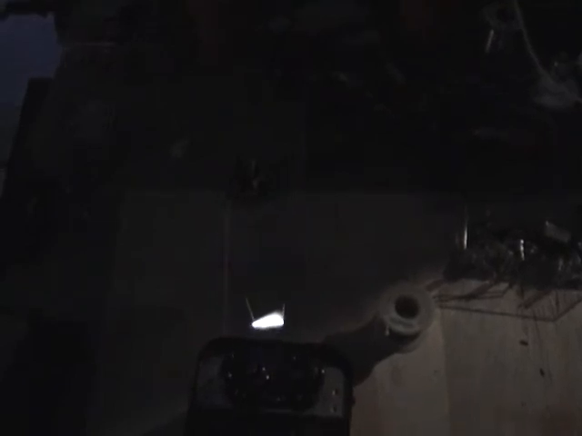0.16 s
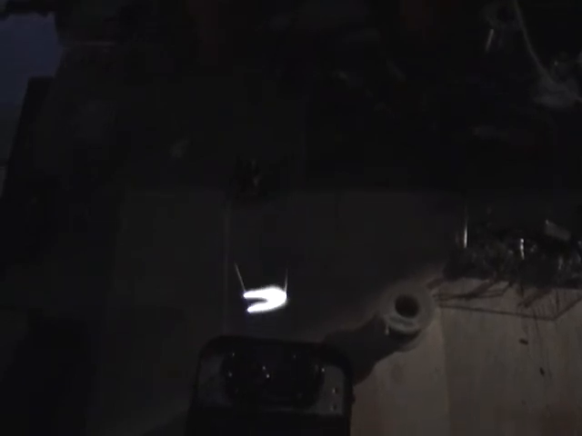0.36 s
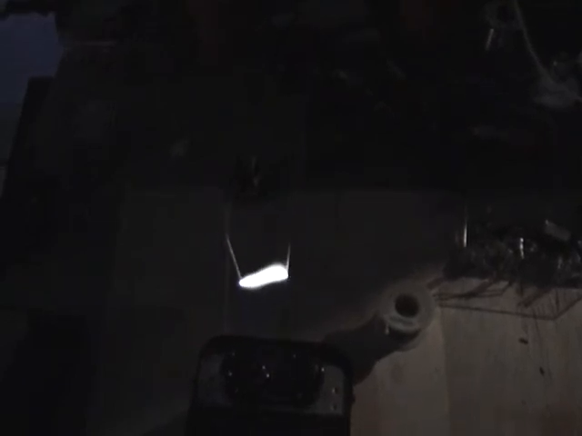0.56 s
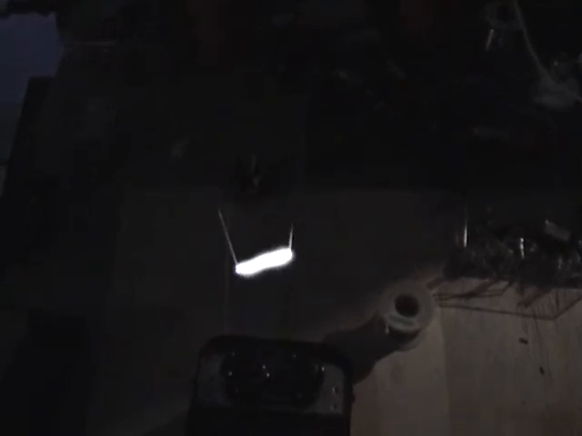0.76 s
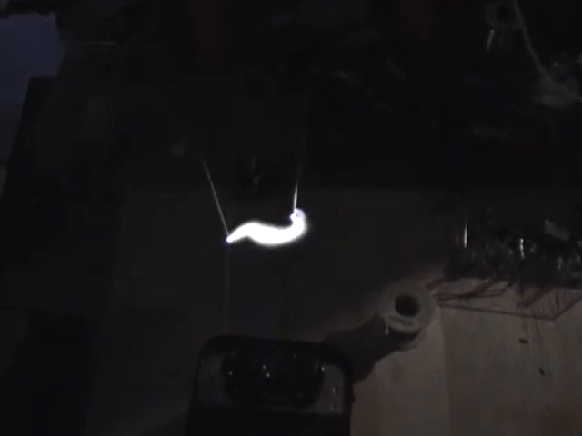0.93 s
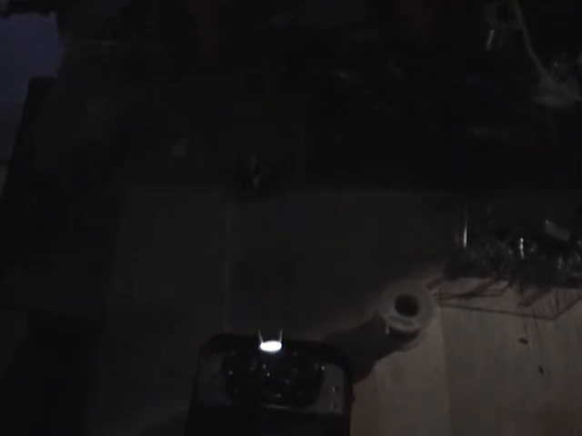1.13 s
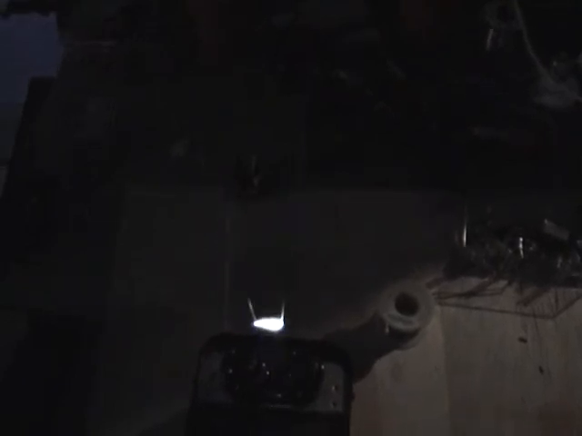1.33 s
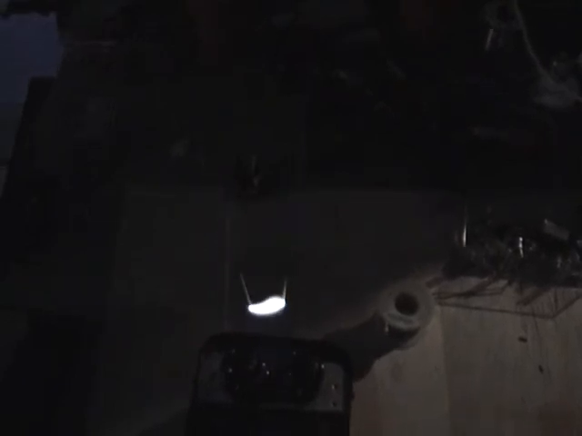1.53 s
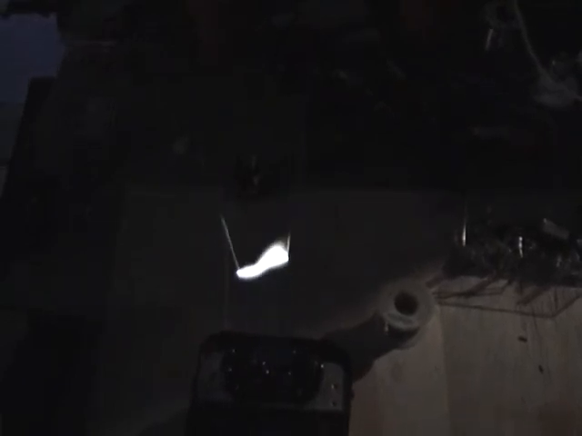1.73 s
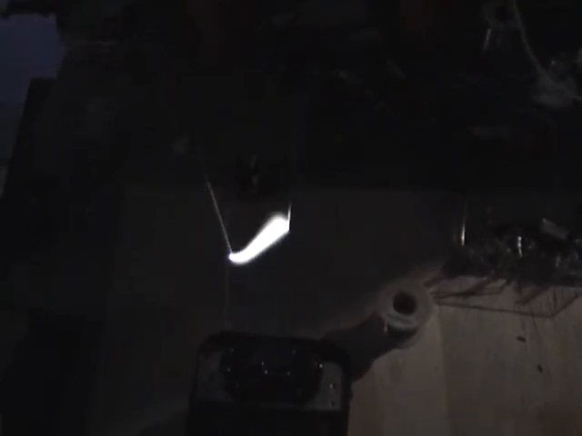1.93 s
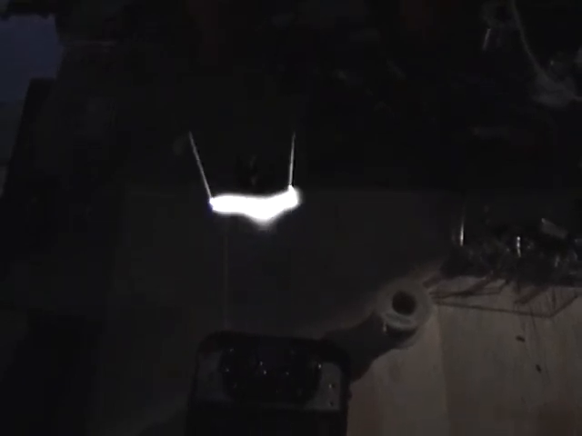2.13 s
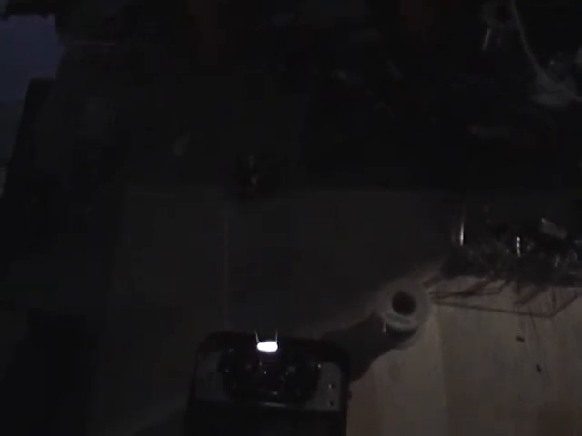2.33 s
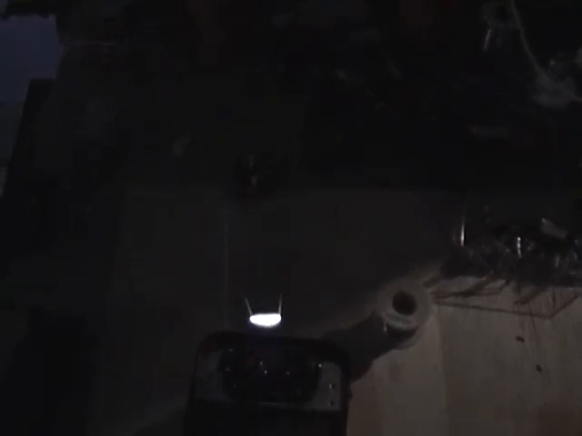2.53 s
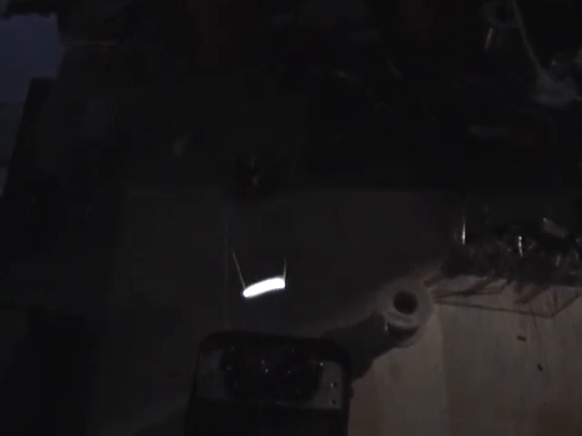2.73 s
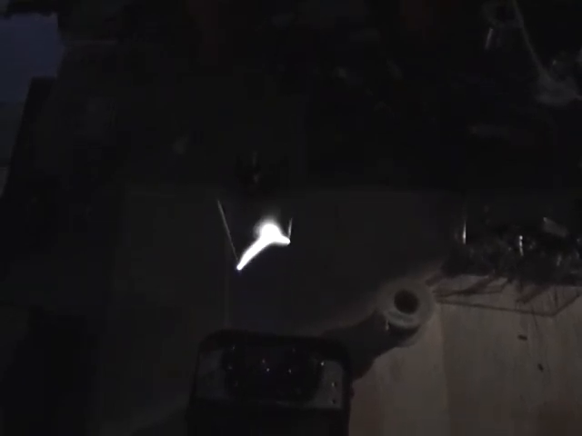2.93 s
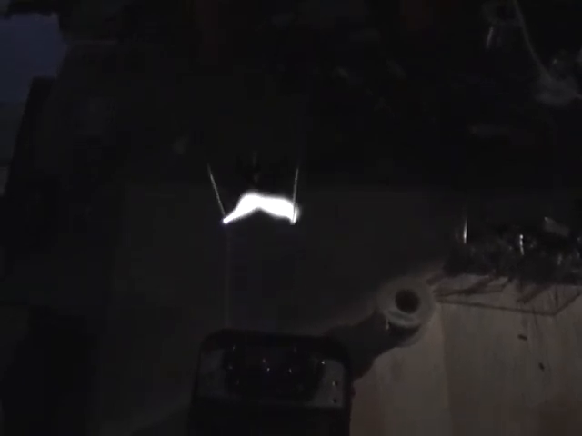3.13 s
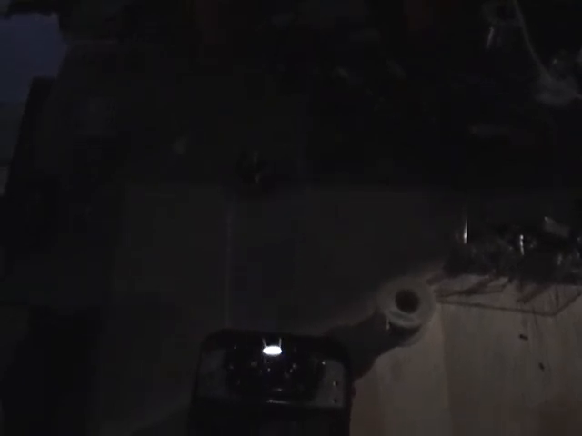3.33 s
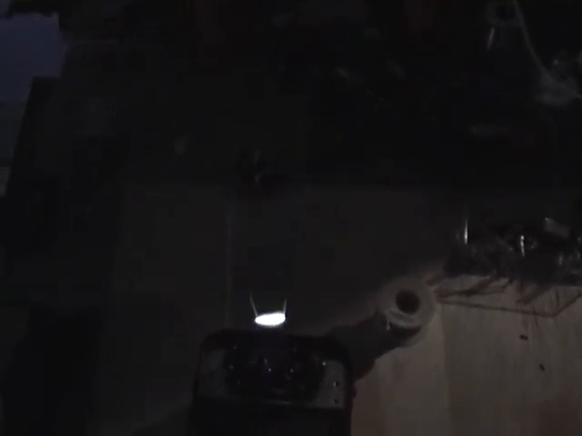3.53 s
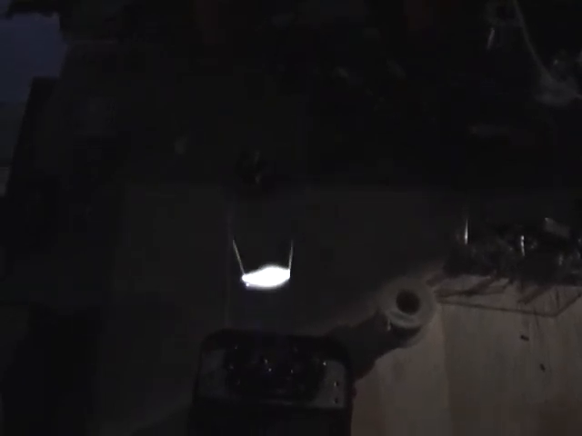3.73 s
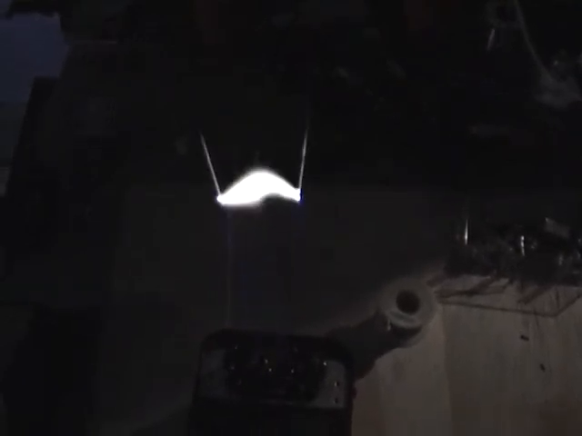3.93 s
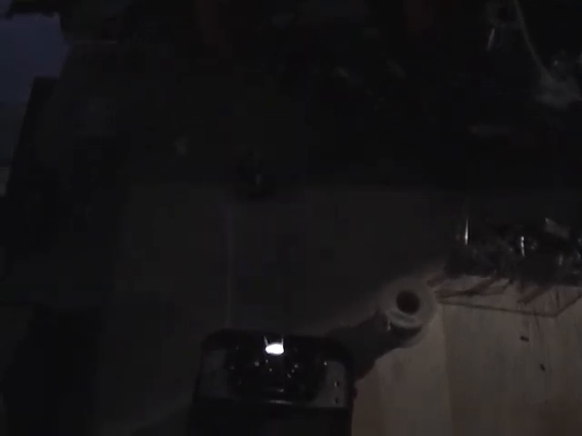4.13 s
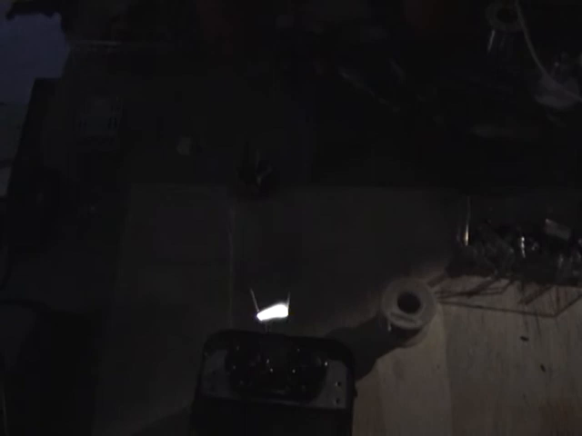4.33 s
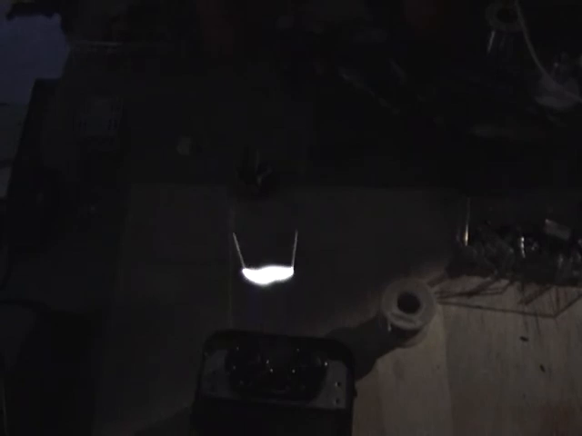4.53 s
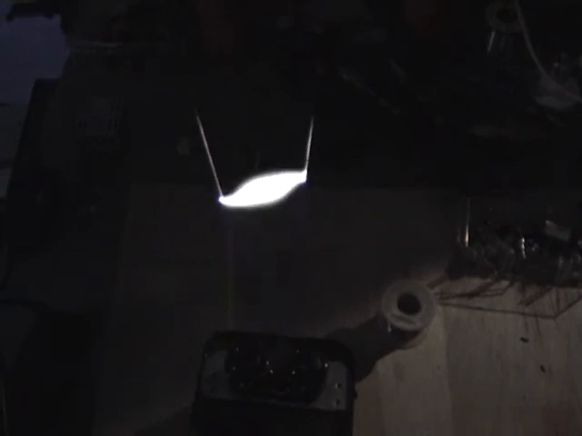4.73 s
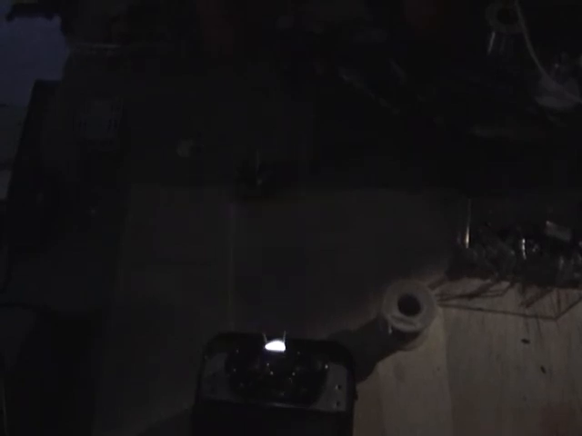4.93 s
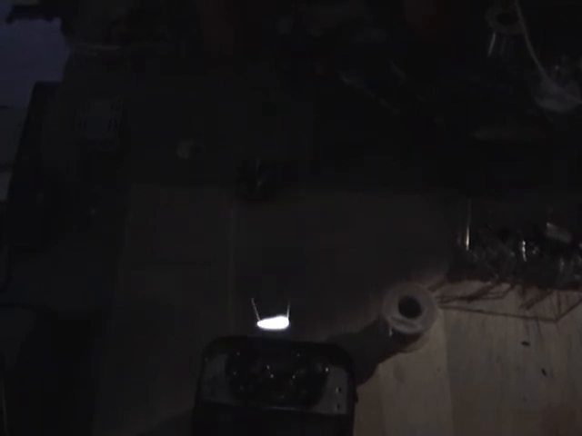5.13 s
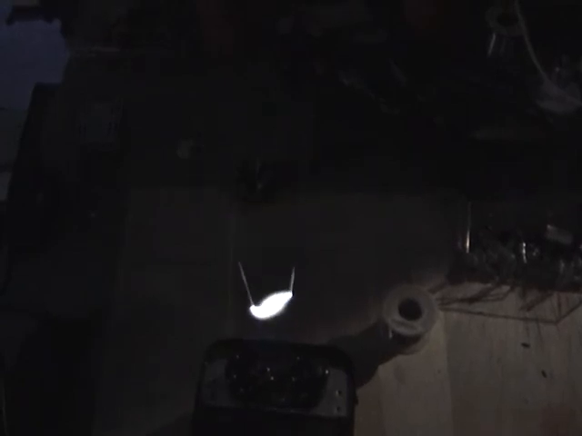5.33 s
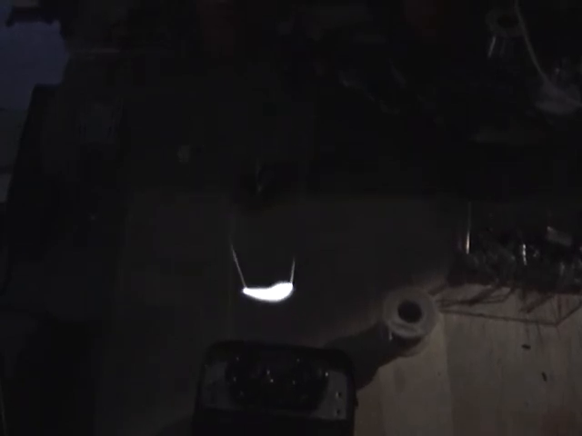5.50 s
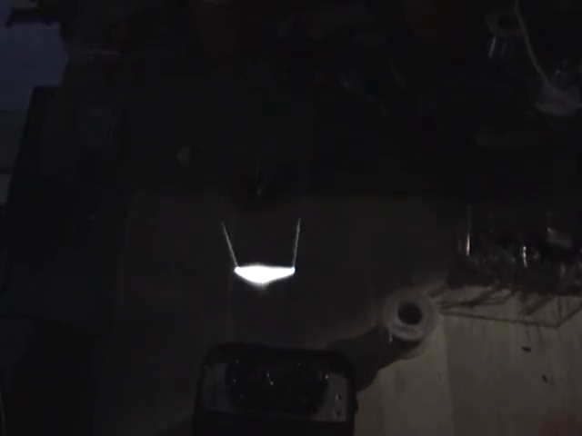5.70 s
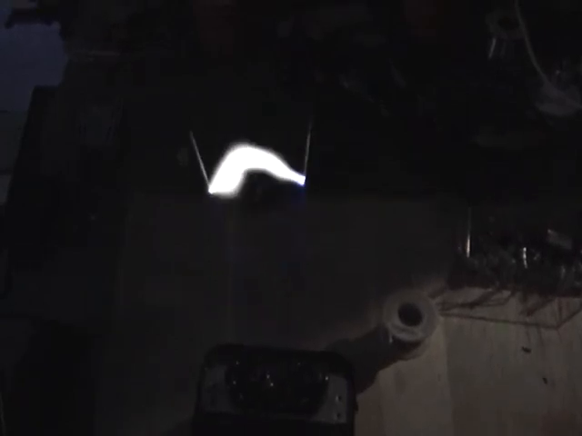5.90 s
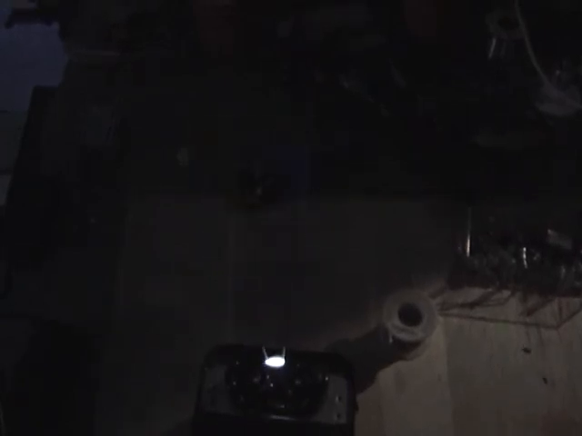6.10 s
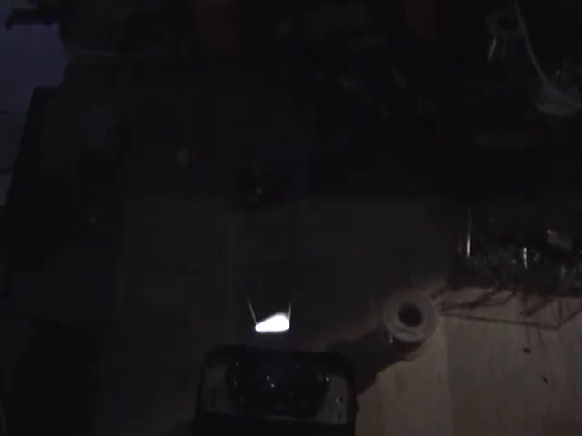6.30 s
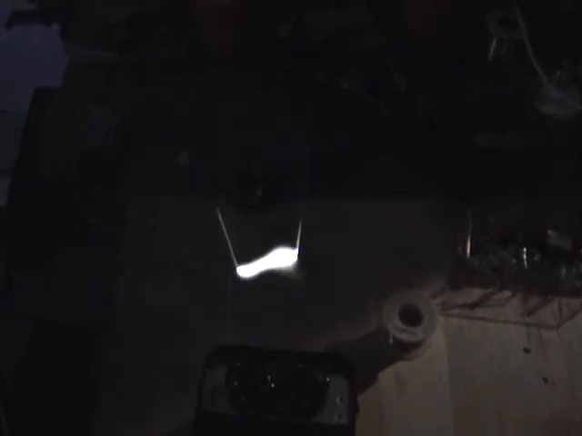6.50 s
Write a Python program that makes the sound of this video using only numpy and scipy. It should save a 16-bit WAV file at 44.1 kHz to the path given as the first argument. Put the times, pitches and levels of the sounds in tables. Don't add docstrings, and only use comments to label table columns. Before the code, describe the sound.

A harsh 120-per-second electric buzz swells and darkens as an arc climbs two rods, breaks with a sharp snap, and restarts over fan noise.

```python
import sys
import numpy as np
from scipy import signal
from scipy.fft import rfft, irfft
from scipy.io import wavfile
from scipy.ndimage import uniform_filter1d

SR = 44100
rng = np.random.default_rng(int(sys.argv[2]) if len(sys.argv) > 2 else 0)


def amplitude_ratio(level_db):
    exponent = np.asarray(level_db, float) / 20
    return 10 ** exponent


def unload_audio(sound):
    columns = np.transpose(np.atleast_2d(sound))
    steps = np.round(np.clip(columns, -1, 1) * 32767)
    wavfile.write(sys.argv[1], SR, steps.astype(np.int16))


N = 289296
STRIKE_HZ = 119.988
FRAME = 512
FRAME_HZ = np.arange(FRAME // 2 + 1) * SR / FRAME
JW = 2j * np.pi * FRAME_HZ

# turbulence onset t/s, sputter before onset level/dB, tick strength/dB, background level/dB
CLIMBS = [
    (.47, -23, 0.5, -34),
    (1.72, -27, 1, -33),
    (2.84, -20, 1, -33.5),
    (3.78, -61, -0.5, -34.5),
    (4.4, -33, -0.5, -34),
    (5.56, -27, -.5, -35),
    (6.41, -18, -1.5, -35),
]
# t/s, peak level/dB, length/ms, last tick of the dying arc level/dB
SNAPS = [
    (.9445, -5, .85, -20),
    (2.1614, -4, .85, -26),
    (3.2533, -2, .45, -7),
    (4.0447, -3, .55, -6),
    (4.7781, -1, .55, -9),
    (5.9619, -4, .6, -8),
]
# t/s, half length/s, shortening/0-1, background change level/dB
FOLDS = [
    (2.084, 0.26, .4, -2.5),
    (3.065, 0.19, 0.81, -7),
    (3.92, 0.1, .3, -1.5),
    (4.57, 0.1, 0.37, -1),
    (5.373, 0.14, 0.22, -0.5),
    (5.868, 0.21, 0.5, -3),
]


def arc():
    # t/s, extra level/dB of single strikes
    odd_strikes = [(0.8777, 2), (0.9278, 4.5), (2.1026, -3), (2.1279, 6), (2.1446, 3.5), (2.3292, -4),
                   (3.028, -8), (3.103, -8), (3.945, 0.5), (5.0544, 3), (5.3287, 5), (5.4206, 4.5),
                   (5.6117, 5), (5.7366, 4.5), (5.7945, 7.5), (1.9612, -2), (2.9862, 5.5), (3.1525, 5),
                   (5.8945, 4), (5.9194, -35.5), (5.9362, -13), (5.9447, 3)]
    foot_s = .00405
    grid = np.arange(int((N / SR - foot_s) * STRIKE_HZ)) / STRIKE_HZ + foot_s
    lead, peak_db, sputter_db, length = [column[:, None] for column in channel(grid - .001)]
    height, length = np.clip(lead, 0, 1.6), np.clip(length, 0, 1.6)
    chance = rng.standard_normal((len(grid), 11))
    swing = (-1.) ** np.arange(len(grid))[:, None]

    peak_db = peak_db + (0.43 + 0.22 * height) * chance[:, :1] - (0.13 + 0.11 * height ** 2) * swing
    for when, extra_db in odd_strikes:
        strike = np.argmin(abs(grid - lead[:, 0] / 1000 - when))
        peak_db[strike] += extra_db
        sputter_db[strike] += 0.2 * extra_db
    for when, _, _, last_db in SNAPS:
        peak_db[np.argmin(abs(grid - .0013 - when))] = last_db

    early_ms = lead + .025 * swing + (.008 + .04 * height ** 2) * chance[:, 1:2]
    start = grid - early_ms[:, 0] / 1000
    patchy_db = 4.5 * uniform_filter1d(chance, size=12, axis=0) + .8 * chance
    paths = near_echoes(height, patchy_db[:, 3:])
    paths = paths + after_sparks(sputter_db, 2.6 * chance[:, 2:3], length)
    return lay(amplitude_ratio(peak_db + 7.0) * radiated_tick(height, length) * paths, start)


def near_echoes(height, patchy_db):
    echoes = [
        (.21, .95, 9, -26, .003),
        (.44, .06, -10, 1, -.008),
        (.43, .95, -5, -14, .008),
        (.75, .09, -12, 0, -.015),
        (.86, .88, -10, -5, .015),
        (1.44, .05, -15, 0, -.02),
        (1.8, .68, -18, -3, .02),
        (2.3, .65, -20, -2, -.02),
    ]
    side = np.array([.5, -.5])[:, None, None]
    paths = np.exp(JW * side * 4e-6) * amplitude_ratio(side * 1.2 * np.tanh((FRAME_HZ - 6500) / 1500))
    rise = np.minimum(height ** .7, 1)
    for k, (delay, growth, foot_db, fade_db, lag) in enumerate(echoes):
        level_db = foot_db + fade_db * rise + patchy_db[:, k:k + 1]
        bright = np.where(growth > .5, FRAME_HZ ** 2 / (FRAME_HZ ** 2 + 4500 ** 2), 1)
        delay_ms = delay + growth * height / (1 + .3 * height) + side * lag
        paths = paths + amplitude_ratio(level_db) * bright * np.exp(-JW * delay_ms / 1000)
    return paths


def after_sparks(sputter_db, scatter_db, length):
    after = np.arange(FRAME) / SR
    dying = np.exp(-after / 0.0021) + 2.4 * np.exp(-after / 0.00036)
    dying = dying * (after > .00012) * (after < .009)
    sparks = rfft(rng.standard_normal((2, len(length), FRAME)) * dying)
    ring_hz = 8650 / (1 + 0.24 * length)
    ring = 1 / (1 + 2.5j * (FRAME_HZ / ring_hz - ring_hz / (FRAME_HZ + 1)))
    level_db = 2.11 * (sputter_db + 15.5) - 24.5 + scatter_db
    return amplitude_ratio(level_db) * widened(sparks[0], 0.58 * sparks[1], FRAME_HZ) * (0.46 + ring)


def radiated_tick(height, length):
    # f/Hz, width/Hz, level/dB
    case_modes = [
        (2860, 430, -21),
        (3236, 536, 3),
        (7850, 1600, -26),
        (5210, 860, -9),
        (6170, 430, 4.5),
    ]
    shape = tick_shape(6500 / (1 + 4.26 * length), 10500 / (1 + 0.39 * length), 0.47, 17000 / (1 + 2.74 * length))
    modes = 1
    for mode_hz, width, db in case_modes:
        share = -0.36 if 5600 <= mode_hz <= 7500 else 1
        modes = modes + amplitude_ratio(db) * share * resonance(mode_hz, width)
    shielded = 0.76 / (1 + np.exp((height - .33) / .025))
    return shape * modes * (1 - shielded * resonance(4000, 2600))


def resonance(mode_hz, width):
    return 1 / (1 + 1j * (FRAME_HZ ** 2 - mode_hz ** 2) / (FRAME_HZ + 1) / width)


def tick_shape(low_hz, peak_hz, damping, top_hz):
    low, s = JW / (2 * np.pi * low_hz), JW / (2 * np.pi * peak_hz)
    highpass = low ** 3 / (1 + low) / (1 + low + low ** 2)
    ring = s / (1 + damping * s + s ** 2)
    return highpass * ring / (1 + JW / (2 * np.pi * top_hz))


def channel(s):
    # t/s, level/dB, half length/s
    swells = [(.01, 4, 0.061), (0.614, 3, 0.042), (0.668, -5.5, 0.031), (0.803, -2, .05), (0.943, -26, .03),
              (1.9, -3, 0.15), (2.1, 0.5, 0.043), (2.136, -18, 0.018), (2.964, -3.5, 0.019),
              (2.982, -4, .025), (3.164, -10, 0.092), (5.617, 0.5, .06), (5.752, 1.5, 0.041),
              (3.998, -9.5, 0.038), (4.412, -1.5, .15), (4.688, -2, .08), (5.524, -0.5, 0.049),
              (5.824, -2.5, 0.11), (5.949, -14, 0.051)]
    foot_db, young_db, young_s = -43, -14.5, 0.19
    (climb, age, _), (lead, strain) = climb_at(s), lead_ms(s)
    rough_s, calm_db, strength_db, _ = np.array(CLIMBS)[climb].T
    swell_db = sum(db * tent(s, when, half) for when, db, half in swells)

    peak_db = -10.5 + strength_db + 5 * lead - 19.5 * np.exp(-age / 0.068) + swell_db

    gliding_db = foot_db + (young_db - foot_db) * ramp(age, 0, young_s)
    gliding_db = gliding_db + (calm_db - young_db) * ramp(s, s - age + young_s, rough_s)
    rough_db = -19 + 3.0 * lead - 0.34 * swell_db + 3.5 * strain
    torn = ramp(s, rough_s - .04, rough_s + 0.01)
    sputter_db = (1 - torn) * gliding_db + torn * rough_db

    length = 1.13 * (1 - np.exp(-lead / 0.59))
    length = length - sum(share * tent(s, when, half) for when, half, share, _ in FOLDS)
    return lead, peak_db, sputter_db, length


def lead_ms(s):
    # t at full bow/s, lead gained/ms, build-up/s, share kept
    bow_events = [(.513, .2, .22, -.4), (.692, .2, .13, -.15), (.9, .55, .16, .25), (1.77, .22, .2, .55),
                  (1.88, .32, .08, .5), (1.96, .12, .06, -3.6), (2.13, .4, .15, 1), (2.86, .13, .2, 1),
                  (2.94, .5, .08, .1), (3.02, .24, .06, 1), (3.12, .05, .05, -4.5), (3.62, .22, .35, 1),
                  (3.83, .33, .14, 1), (4.0, .15, .15, 1), (4.38, .2, .35, 1), (4.48, .39, .09, .46),
                  (4.58, .31, .09, .5), (5.15, .1, .3, 1), (5.345, .31, .17, .05), (5.635, .42, .13, 0),
                  (5.74, .3, .09, .4), (5.92, .4, .13, 1), (6.36, .35, .25, 1), (6.56, .35, .25, 1)]
    stretches = [.9, .2, .75, .55, .8, .4, 0]
    climb, age, left = climb_at(s)
    bows = strain = 0
    for when, ms, build, kept in bow_events:
        bow = ms * (climb == climb_at(when)[0])
        built, shorted = ramp(s, when - build, when) ** 2, ramp(s, when, when + .012)
        bows = bows + bow * (built - (1 - kept) * shorted)
        strain = strain + bow * (1 - kept) * built * (1 - shorted)
    steady = 1.0 * age
    return steady + bows + np.array(stretches)[climb] * ramp(.01 - left, -.06, 0) ** 2, strain


def climb_at(s):
    breaks = np.array(SNAPS)[:, 0]
    feet = np.r_[-.27, breaks + .0155]
    climb = np.searchsorted(breaks + .004, s)
    return climb, np.maximum(s - feet[climb], 0), np.r_[breaks, 2 * N / SR][climb] - s


def ramp(s, start, end):
    return np.clip((s - start) / (end - start + 1e-6), 0, 1)


def tent(s, when, half):
    return np.clip(1 - abs(s - when) / half, 0, 1)


def lay(frames, start_s):
    margin = 16
    at = np.floor(start_s * SR).astype(int)
    w = 2 * np.pi * np.arange(FRAME // 2 + 1) / FRAME
    waves = irfft(frames * np.exp(-1j * w * (start_s * SR - at + margin)[:, None]), FRAME)
    out = np.zeros((2, N + 2 * FRAME))
    for side in range(2):
        np.add.at(out[side], at[:, None] + np.arange(FRAME), waves[side])
    return out[:, margin:N + margin]


def snaps():
    # f/Hz, level/dB
    snap_ring = [
        (7700, 0),
        (11000, -11),
        (13300, -7),
        (14800, -12),
        (4600, -14),
        (6200, -11),
        (9300, -13),
        (3000, -18),
        (1500, -17),
        (700, -16),
    ]
    t, out = np.arange(400) / SR, np.zeros((2, N))
    for when, peak_db, length, _ in SNAPS:
        ring = 0
        for hz, db in snap_ring:
            level = amplitude_ratio(db + rng.normal(0, 1.5, (2, 1)))
            ring = ring + level * np.sin(2 * np.pi * hz * rng.normal(1, .03) * t)
        burst = (1 - np.exp(-t / .00006)) * np.exp(-np.maximum(t - length / 1000, 0) / .00025)
        at = round(when * SR)
        out[:, at:at + len(t)] += amplitude_ratio(peak_db - 4.0) * ring * burst
    return out


def workshop(x):
    # delay/ms, level/dB
    walls = [
        (3.35, -21),
        (5.3, -24),
        (10.2, -20),
        (14.6, -28),
    ]
    t60, tail_db = 0.17, -37.5
    t = np.arange(int(.4 * SR)) / SR
    mid, side = amplitude_ratio(tail_db - 60 * t / t60) * rng.standard_normal((2, len(t))) * (t > .002)
    for delay, db in walls:
        mid[round(delay * SR / 1000)] += amplitude_ratio(db)
    hz = np.arange(len(t) // 2 + 1) * SR / len(t)
    answer = irfft(widened(rfft(mid), 0.96 * rfft(side), hz), len(t))
    answer = signal.sosfilt(signal.butter(1, 14000, fs=SR, output="sos"), answer)
    return x + signal.fftconvolve(x, answer, axes=1)[:, :N]


def widened(mid, side, hz):
    low, high = (hz / 5000) ** 2, (hz / 10500) ** 6
    sign = np.array([1, -1]).reshape(2, *[1] * mid.ndim)
    return mid + side * sign * low / (1 + low) / (1 + high)


def background():
    # f/Hz, level/dB per Hz
    fan = [(60, -50), (110, -24), (155, -21.5), (190, -5.5), (300, 1.5), (345, -3.5), (397, 0.5), (525, -7),
           (790, -12), (1220, -8), (1900, -17.5), (4000, -21), (9000, -20.5), (16000, -48)]
    # f/Hz, level/dB per Hz
    rumble_spectrum = [(15, -30), (30, -10), (48, 0), (70, -15), (100, -0.5), (140, -3), (200, 0),
                       (400, -70)]
    overtones = [(2, -18), (3, -16.5), (4, -18.5), (5, -15.5), (6, -15), (7, -18), (10, -18.5)]
    t = np.arange(N) / SR
    level_db = background_db(t)
    lead = uniform_filter1d(lead_ms(t)[0], size=2000)
    steps = np.arange(0, N / SR, .15)

    hum = 0
    for k, db in overtones:
        wander_db = np.interp(t, steps, 0.9 * rng.standard_normal(len(steps)))
        phase = k * STRIKE_HZ * t + rng.random() + 0.23 * k ** .5 * lead
        hum = hum + amplitude_ratio(db + wander_db) * np.sin(2 * np.pi * phase)

    wander_db = np.interp(t, steps, 0.7 * rng.standard_normal(len(steps)))
    core_db = wander_db - 43.5 - 14.8 * np.minimum(lead, 1.2) + 1.06 * (level_db + 37)
    core = amplitude_ratio(core_db) * np.sin(2 * np.pi * STRIKE_HZ * t)
    rumble = amplitude_ratio(-46.5 + 0.79 * (level_db + 34.5)) * air_noise(rumble_spectrum)
    return amplitude_ratio(level_db) * (air_noise(fan) + hum) + core + rumble


def background_db(s):
    # t/s, half length/s, level/dB
    roars = [
        (0.85, 0.14, 3.5),
        (1.89, 0.23, 2.5),
        (5.652, 0.51, 3),
    ]
    climb, age, _ = climb_at(s)
    duck_db = -7 * np.exp(-age / 0.13)
    folds_db = sum(db * tent(s, when, half) for when, half, _, db in FOLDS)
    roars_db = sum(db * tent(s, when, half) for when, half, db in roars)
    return np.array(CLIMBS)[climb, -1] + duck_db + folds_db + roars_db


def air_noise(spectrum):
    # f/Hz, left-right likeness/0-1
    likeness = [(30, .8), (60, 0.7), (130, 0.66), (290, 0.97), (640, 1), (1400, 0.82), (3000, 1),
                (8000, 0.13), (13000, 0.18)]
    # f/Hz, left minus right level/dB
    leaning = [(60, -2), (180, 2.0), (550, 4.5), (1650, -1), (4970, 0), (15000, 18)]
    # f/Hz, left leads/rad
    phase_lead = [(25, 1.4), (60, 1.9), (130, 0.51), (260, 0.23), (700, -0.41), (1290, -0.21),
                  (2000, -0.65)]
    hz = np.arange(N // 2 + 1) * SR / N
    mid, side = rfft(rng.standard_normal((2, N)))
    alike, sign = np.clip(at_hz(likeness, hz), 0, 1), np.array([[1], [-1]])
    both = np.sqrt(1 + alike) * mid + np.sqrt(1 - alike) * side * sign
    both = both * amplitude_ratio(at_hz(spectrum, hz) + sign * at_hz(leaning, hz) / 2)
    noise = irfft(both * np.exp(.5j * sign * at_hz(phase_lead, hz)), N)
    return noise / noise.std()


def at_hz(points, hz):
    point_hz, value = np.array(points).T
    return np.interp(np.log(hz + 1), np.log(point_hz), value)


def scene():
    return workshop(arc() + snaps()) + background()


def band_limit(x):
    return signal.sosfilt(signal.butter(12, 16990, fs=SR, output="sos"), x)


def record(dry):
    since = np.arange(N) / SR - np.array(SNAPS)[:, :1] - .0015
    clamp = np.sum(np.exp(-abs(since) / 0.03) * (since > 0), axis=0)
    dry = dry * amplitude_ratio(-4.0 * clamp)
    hiss = signal.sosfilt(signal.butter(2, 9000, "high", fs=SR, output="sos"), rng.standard_normal(N))
    dry = dry + amplitude_ratio(-60.0) * hiss
    rounded = np.tanh(dry / 1.5) * 1.5
    cut = signal.sosfilt(signal.cheby2(20, 45, 16200, fs=SR, output="sos"), rounded)
    return band_limit(cut)


dry = scene()
out = record(dry)
unload_audio(out)
```